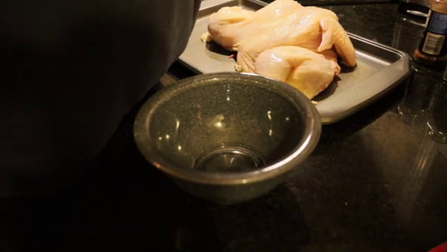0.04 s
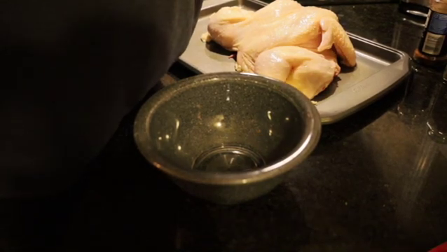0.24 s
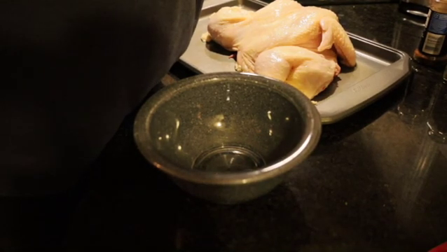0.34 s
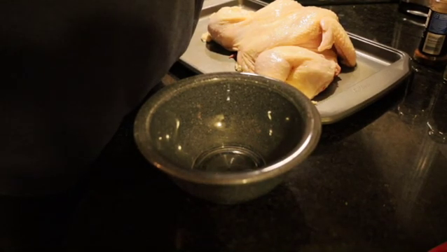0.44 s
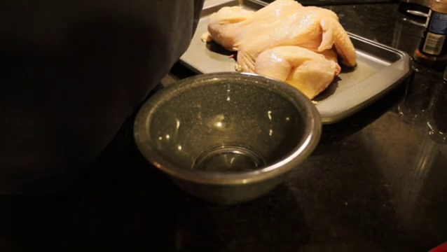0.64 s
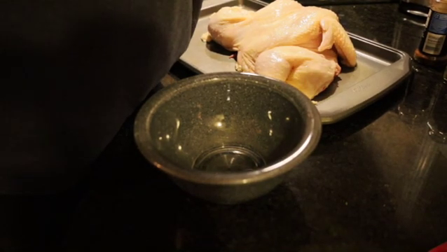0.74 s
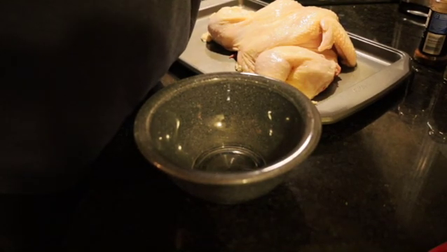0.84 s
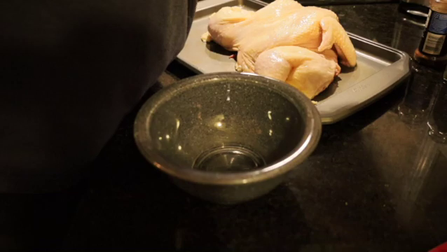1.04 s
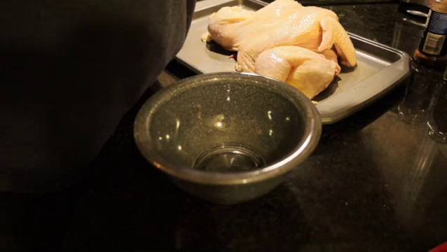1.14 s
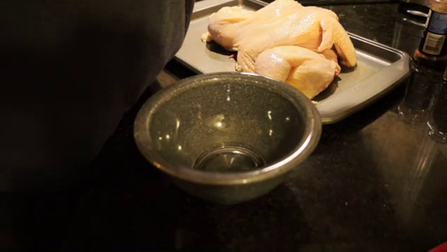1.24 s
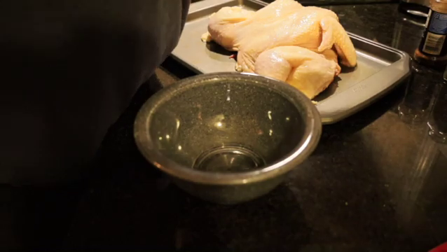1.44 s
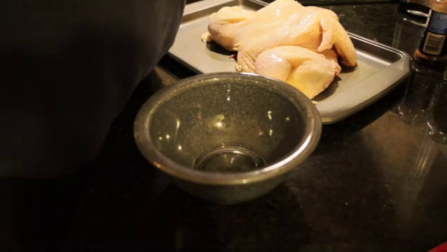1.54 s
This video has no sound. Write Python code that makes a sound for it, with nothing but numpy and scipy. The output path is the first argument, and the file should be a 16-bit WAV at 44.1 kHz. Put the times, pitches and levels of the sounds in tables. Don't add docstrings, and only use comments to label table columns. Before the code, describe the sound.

Close-up crunching of packed, moist sugar: a growing dig with a sharp metallic clack, a quick push, a longer gritty press, then small faint ticks. Small quiet room, short soft echo, very low hum, thin bass.

```python
import sys
import numpy as np
from scipy import signal
from scipy.fft import rfft, irfft
from scipy.io import wavfile

SR = 44100
rng = np.random.default_rng(int(sys.argv[2]) if len(sys.argv) > 2 else 0)


def wav_out(sig):
    wavfile.write(sys.argv[1], SR, np.round(np.clip(np.atleast_2d(sig).T, -1, 1) * 32767).astype(np.int16))


def undo_db(level):
    steps = np.asarray(level, float) / 20
    return 10 ** steps


N = 70560

# time_s, level_db, crack_sharpness_db_per_octave, cup_boom_db
PUSHES = [
    [(.06, -76, -20, 4), (.07, -54, -25, 1.5), (.09, -49.5, 9.5, 10.5), (.15, -48.5, 10.5, -9),
     (.17, -46.5, -0.5, 8.5), (.195, -46, -1, -5.5), (.225, -46.5, 4.5, -0.5), (.3, -44.5, 10, 8.5),
     (.42, -65, -25, -2.5)],
    [(.44, -68, -13, 12), (.48, -53.5, -13, -4.5), (.515, -43, 1.5, -0.5), (.535, -50, 0, 6),
     (.585, -71.5, 3, 4)],
    [(.61, -60.5, -20, 0), (.633, -55.5, -14, -8), (.645, -47.5, -14, 8.5), (.72, -50, -2, 0),
     (.8, -48, 7, -1), (.87, -50.5, 2, 1.5), (.99, -50.5, -2, 0.5), (1.1, -52, -5.5, 1.5),
     (1.205, -67.5, 4.5, 6.5)],
    [(1.222, -69, 5, 4.5), (1.27, -62, 3, 13), (1.3, -73.5, -2.5, -5), (1.335, -100, -12, 20)],
]
# pitch_hz, level_db_per_hz
SUGAR_COLOUR = [(100, -29), (330, -14), (600, -19), (1400, -20.5), (3400, -6.5), (6000, -16),
                (10000, -32.5), (15500, -42)]
# pitch_hz, width_hz, lift_db
HOLLOWS = [(830, 85, 9.5), (2100, 870, 5.5), (3516, 620, 8.5), (4730, 350, 11.5), (12900, 2500, 3.5)]
# start_s, length_s, pitch_hz, width_hz, level_db
RASPS = [(0.066, 0.078, 813, 150, -53.5), (.755, 0.078, 865, 200, -59.5), (0.913, 0.013, 3500, 686, -48),
         (1.042, 0.013, 2410, 600, -57), (1.096, 0.067, 1900, 500, -58), (0.34, 0.027, 2180, 120, -56),
         (0.832, 0.02, 3645, 300, -49), (1.031, 0.13, 6900, 508, -67), (1.205, 0.092, 2430, 150, -61),
         (1.212, 0.087, 3300, 304, -57), (1.24, .05, 1450, 400, -66), (.667, .022, 850, 200, -57),
         (.65, .06, 1700, 400, -58), (.02, .02, 2800, 1500, -75), (1.362, .03, 550, 250, -66),
         (1.165, .03, 1300, 500, -64)]
# start_s, peak_db, pitch_hz, ring_t60_s, crack_db
SNAPS = [(0.0667, -35, 3400, .02, -26), (0.0784, -36, 2055, 0.02, -18), (0.1016, -23.5, 2260, 0.018, -15.5),
         (0.148, -39, 3300, 0.023, -5), (0.5108, -32, 3890, 0.026, -28), (0.5937, -36, 3730, 0.017, -34),
         (0.6376, -25, 3250, 0.006, -22), (0.6456, -23, 2570, 0.008, -20), (0.6514, -29, 2800, 0.012, -12),
         (0.6682, -27, 3500, 0.008, -20), (0.7046, -20, 2500, 0.006, -22), (0.8388, -27, 3650, 0.02, -23),
         (0.8466, -29, 3700, 0.015, -18), (1.0695, -31, 3500, 0.008, -12), (.8085, -39, 3300, .006, -12),
         (.8585, -34, 5200, .01, -12), (.8415, -35, 3600, .015, -20), (.9745, -34, 3300, .008, -12),
         (1.0075, -34, 3400, .008, -12), (1.0454, -41, 2200, .015, -14), (1.1292, -37, 1970, .015, -14),
         (1.2165, -43, 3270, .015, -22), (1.2289, -46, 3170, .012, -20), (.6545, -32, 3300, .01, -12),
         (.5175, -33, 3500, .012, -15)]
# start_s, peak_db, dullness_hz, thud_pitch_hz
KNOCKS = [(.2335, -19, 2550, 945), (.2345, -21, 5000, 2400), (.2375, -22, 4000, 2100),
          (.2403, -24, 5000, 2200), (.2452, -23, 8000, 3400), (.2463, -20, 8000, 2500),
          (.2503, -24, 5000, 1900), (.2535, -25, 3500, 2050), (.2565, -18, 4000, 2050),
          (.2600, -24, 4000, 2200), (.2650, -20, 3970, 2100), (.2680, -21, 3500, 2000),
          (.2755, -22, 3500, 2300), (.2790, -27, 3500, 1900)]
# pitch_hz, level_db, ring_t60_s
METAL_TONES = [(840, -10, .15), (915, -10, .15), (1665, 2, .13), (2090, -3, 0.07), (2191, -8, .15),
               (2320, -6, .13), (3300, -4, 0.12), (3391, -16, 0.19), (4540, -4, 0.08), (2600, -8, .1),
               (6546, -20, .15)]
# share_of_pitch, ring_t60_s, level_db
THUD_PARTS = [(1, .013, 0), (1.2, 0.012, -10), (0.83, 0.006, -10)]
# pitch_hz, ring_t60_s, level_db
COUNTER_TONES = [(345.4, 0.017, -30), (160, 0.069, -23)]
# start_s, pitch_hz, level_db, rise_s, ring_t60_s
SINGING = [
    (.248, 4556, -23, .016, .25),
    (.25, 2050, -26, .008, .17),
    (.2338, 4600, -23, .001, .03),
]
# pitch_hz, level_db_per_hz
RATTLE_COLOUR = [(100, -50), (400, -27), (900, -3.5), (2050, 6.5), (3500, 1.5), (5200, -7), (9000, -21),
                 (15500, -47.5)]
# start_s,
# peak_db, pitch_hz, ring_t60_s, crack_db
TAPS = [(.192, -39, 340, 0.042, -8), (.9215, -36, 830, 0.013, -6), (.9172, -46, 12800, 0.01, -4),
        (.9172, -52, 11000, .01, -6), (.9172, -48, 8340, 0.012, 4), (1.327, -58, 450, 0.02, 0),
        (1.354, -49, 358, 0.065, -18), (1.353, -49, 1930, 0.024, 0), (1.353, -54.5, 700, 0.025, -15),
        (1.396, -53.5, 2437, 0.022, -11), (1.426, -63, 4450, 0.015, 6), (1.448, -55.5, 7420, 0.014, -10.5),
        (1.448, -62, 8300, 0.02, -6), (1.458, -62.5, 7650, 0.018, -6), (1.469, -60, 7480, 0.012, -3),
        (1.4685, -45, 491, 0.016, -25), (1.502, -66, 3300, 0.013, 0), (1.512, -72, 5550, 0.012, 10),
        (1.571, -38.5, 2170, 0.012, -3), (1.571, -39, 3200, 0.012, -4), (1.570, -47, 5450, 0.013, -5),
        (1.571, -47, 4400, .013, -8), (1.571, -63.5, 11400, 0.011, -8), (1.578, -50.5, 3200, .012, 5),
        (1.586, -56, 3240, .025, -9), (.9172, -50, 14300, .009, -6), (.9172, -28, 3330, .022, -10),
        (.9172, -38, 4700, .012, -3), (.8245, -52, 10200, .014, -15), (1.426, -64, 3350, .012, 0),
        (1.470, -64, 2400, .01, 0), (1.473, -66, 1300, .04, -10), (1.526, -68, 2300, .01, 0),
        (1.328, -64, 1200, .012, -3), (1.396, -64, 3900, .01, -5), (1.571, -62, 9700, .01, -8),
        (.2457, -11, 3200, .016, -4), (.8383, -35, 3640, .03, -6), (.8458, -33, 3700, .018, -8)]
# pitch_hz, level_db_per_hz
TICK_COLOUR = [(200, -11.5), (1500, 4), (3500, 15.5), (6000, -7.5), (12000, -22), (15500, -38.5)]
# pitch_hz, level_db_per_hz
HUM_COLOUR = [(18, -56), (30, -11.5), (410, 0.5), (575, -10), (691, -3), (1140, -10), (4190, -18.5),
              (8280, -28), (15500, -45)]

GRAINS_PER_S, GRAIN_SPREAD_DB, GRAIN_CYCLES = 4500, 3.5, 10.4
CLUMP_DB, SMOOTH_DB = 1.3, -3
METAL_DB, THUD_DB = -24, -4
RATTLE_START_S, RATTLE_DB, RATTLE_T60_S, RATTLE_RISE_S = .246, -24.5, 0.2, 0.007
SHAKE_DB = -45
TAP_RISE_S, TAP_WOBBLE = 0.00083, 0.3
ROOM_T60_S, ROOM_DB, ROOM_DULL_HZ, ROOM_GAP_S = 0.25, -20, 4860, .006
HUM_DB = -74
SHORT_S, LONG_S = np.arange(SR // 10) / SR, np.arange(SR // 3) / SR


def at_hz(points, hz):
    p = np.array(points)
    return np.interp(np.log(np.maximum(hz, 1)), np.log(p[:, 0]), p[:, 1])


def rms_one(x):
    return x / np.sqrt(np.mean(x ** 2) + 1e-20)


def drift(hz):
    r = np.exp(-2 * np.pi * hz / SR)
    wander = signal.lfilter([1], [1, -2 * r, r * r], rng.standard_normal(N + SR))
    return rms_one(wander[SR:])


def ring(x, hz, t60):
    r, w = undo_db(-60 / (t60 * SR)), 2 * np.pi * hz / SR
    return signal.lfilter([0, np.sin(w)], [1, -2 * r * np.cos(w), r * r], x + 1e-18)


def coloured(spectrum):
    white = rfft(rng.standard_normal(N))
    gain = undo_db(at_hz(spectrum, np.fft.rfftfreq(N, 1 / SR)))
    return rms_one(irfft(white * gain, N))


def click(t, db, fade_s):
    return undo_db(db) * np.exp(-t / fade_s) / max(fade_s * SR, 1)


def add(out, s, piece):
    i = int(s * SR)
    out[i:i + len(piece)] += piece[:N - i]


def sugar():
    push_s, *columns = np.concatenate(PUSHES).T
    t = np.arange(N) / SR
    level, tilt, boom = (np.interp(t, push_s, c) for c in columns)
    level = level + CLUMP_DB * drift(54)
    sizes = undo_db(GRAIN_SPREAD_DB * np.minimum(rng.exponential(1, N), 4))
    sizes = sizes * rng.choice([-1, 1], N)
    grains = sizes * (rng.random(N) < GRAINS_PER_S / SR)
    group = rng.integers(0, 6, N)
    out, power = 0, 0
    for k, hz in enumerate(np.geomspace(120, 15000, num=36)):
        cracks = rms_one(grains * (group == k % 6)) + undo_db(SMOOTH_DB) * rng.standard_normal(N)
        t60 = GRAIN_CYCLES / hz
        band = rms_one(np.diff(ring(ring(cracks, hz, t60), hz, t60), prepend=0))
        lift = sum(g / (1 + (2 * (hz - f) / w) ** 2) for f, w, g in HOLLOWS)
        gain = undo_db(at_hz(SUGAR_COLOUR, hz) + lift) * np.sqrt(hz)
        power += gain ** 2
        change_db = tilt * max(np.log2(hz / 5000), 0) + boom * (hz < 1300) + 2.1 * drift(9.3)
        out = out + band * gain * undo_db(change_db)
    moving = (t > push_s[0]) * (t < push_s[-1])
    return out * undo_db(level) / np.sqrt(power) * moving


def rasps():
    out = np.zeros(N)
    for s, length_s, hz, width_hz, db in RASPS:
        rough = rng.standard_normal(N) * undo_db(2.6 * drift(60))
        t60 = 1.9 / width_hz
        band = rms_one(ring(ring(rough, hz, t60), hz, t60))
        swell = np.sqrt(np.sin(np.pi * np.linspace(0, 1, int(length_s * SR))))
        add(out, s, undo_db(db) * swell * band[:len(swell)])
    return out


def snaps():
    out = np.zeros(N)
    noise = coloured(SUGAR_COLOUR)
    chance = rng.uniform(-0.92, 1, (len(SNAPS), 4))
    for row, (s, db, hz, t60, crack_db) in zip(chance, SNAPS):
        hit = click(SHORT_S, db - 10, .00005)
        piece = ring(hit, hz, t60)
        for u in row[1:]:
            piece = piece + 0.47 * np.sign(u) * ring(hit, hz * (1 + 0.24 * u), t60 * 1.2)
        start = int(abs(row[0]) * N / 2)
        crack = noise[start:][:len(SHORT_S)] * undo_db(db + crack_db - 60 * SHORT_S / 0.026)
        add(out, s, piece + crack)
    return signal.sosfilt(signal.butter(2, [1100, 8000], "band", fs=SR, output="sos"), out)


def measure():
    out = np.zeros(N)
    chance_db = rng.normal(0, 3.5, (len(KNOCKS), 12))
    for row, (s, db, dull_hz, thud_hz) in zip(chance_db, KNOCKS):
        hit = click(LONG_S, db, 1 / (2 * np.pi * dull_hz))
        for u, (hz, level_db, t60) in zip(row, METAL_TONES):
            add(out, s, ring(hit, hz, t60) * undo_db(level_db + METAL_DB + u))
        for share, t60, level_db in THUD_PARTS:
            add(out, s, ring(hit, thud_hz * share, t60) * undo_db(level_db + THUD_DB))
        for hz, t60, level_db in COUNTER_TONES:
            add(out, s, ring(hit, hz, t60) * undo_db(level_db))
    for s, hz, db, rise_s, t60 in SINGING:
        swell = (1 - np.exp(-LONG_S / rise_s)) * undo_db(db - 60 * LONG_S / t60)
        add(out, s, swell * np.sin(2 * np.pi * hz * LONG_S))
    return signal.sosfilt(signal.butter(2, [480, 8000], "band", fs=SR, output="sos"), out)


def rattle():
    out = np.zeros(N)
    fall_db = RATTLE_DB - 60 * LONG_S / RATTLE_T60_S + 3.0 * drift(80)[:len(LONG_S)]
    swell = (1 - np.exp(-LONG_S / RATTLE_RISE_S)) * undo_db(fall_db)
    grains = coloured(RATTLE_COLOUR)[:len(LONG_S)] * swell
    shaken = sum(ring(grains, hz, t60) * undo_db(level_db + SHAKE_DB) for hz, level_db, t60 in METAL_TONES)
    add(out, RATTLE_START_S, grains + shaken)
    return out


def taps():
    out = np.zeros(N)
    noise, wobble = coloured(TICK_COLOUR), TAP_WOBBLE * drift(90)
    for k, (s, db, hz, t60, crack_db) in enumerate(TAPS):
        part = slice(k * 1700, k * 1700 + len(SHORT_S))
        shape = (1 - np.exp(-SHORT_S / TAP_RISE_S)) * undo_db(db + 1.5 - 60 * SHORT_S / t60)
        bend = (wobble[part] - wobble[part][0]) * hz / 3000
        tone = np.sin(2 * np.pi * hz * SHORT_S + bend)
        add(out, s, shape * (tone + undo_db(crack_db - 6.5) * noise[part]))
    return out


def kitchen(x):
    t = np.arange(SR // 2) / SR
    tail = rng.standard_normal(len(t)) * undo_db(-60 * t / ROOM_T60_S) * (t > ROOM_GAP_S)
    tail = signal.lfilter(*signal.butter(1, ROOM_DULL_HZ, fs=SR), tail)
    return undo_db(ROOM_DB) * signal.fftconvolve(x, tail / np.sqrt(np.sum(tail ** 2)))[:N]


def hum():
    return undo_db(HUM_DB + 1.5 * drift(6)) * coloured(HUM_COLOUR)


def scene():
    near = sugar() + rasps() + snaps() + measure() + rattle() + taps()
    return (near + kitchen(near) + hum())[None]


def band_limit(x):
    return signal.sosfilt(signal.butter(12, 15800, fs=SR, output="sos"), x)


def record(dry):
    mix = signal.sosfilt(signal.butter(4, 110, "high", fs=SR, output="sos"), dry)
    return band_limit(mix)


dry = scene()
out = record(dry)
wav_out(out)
```